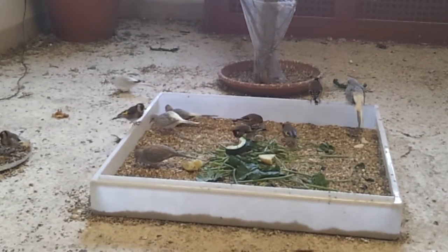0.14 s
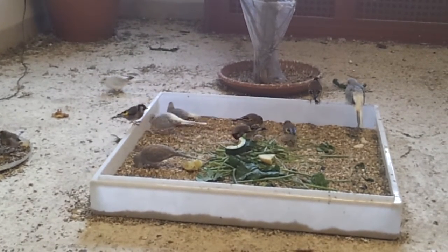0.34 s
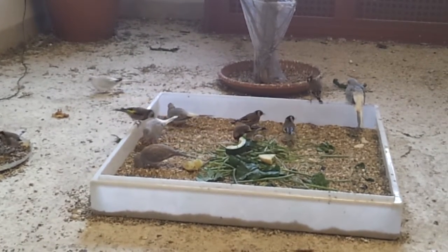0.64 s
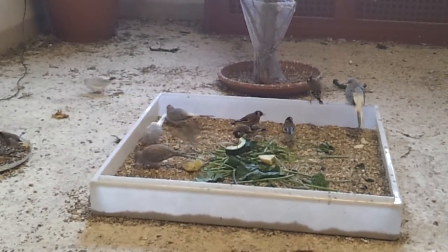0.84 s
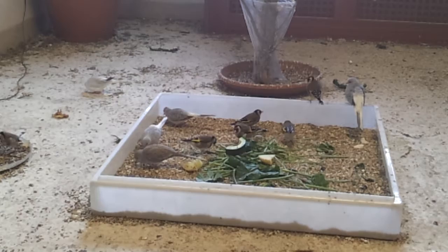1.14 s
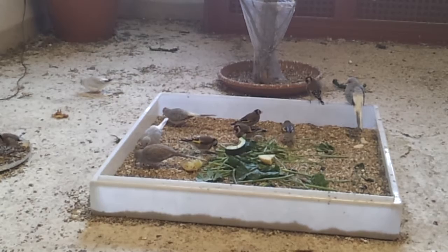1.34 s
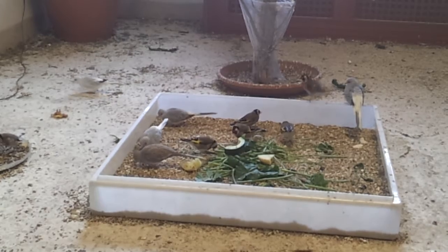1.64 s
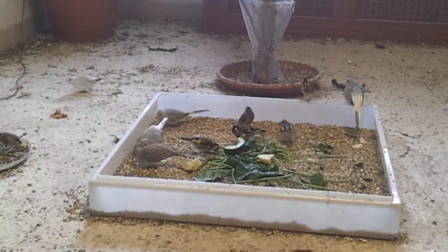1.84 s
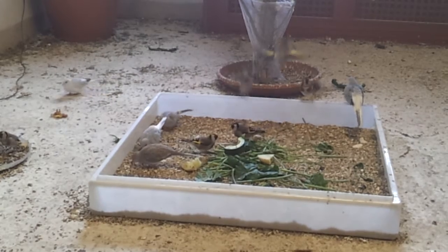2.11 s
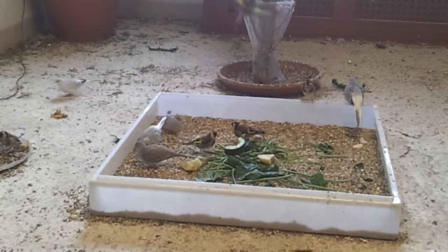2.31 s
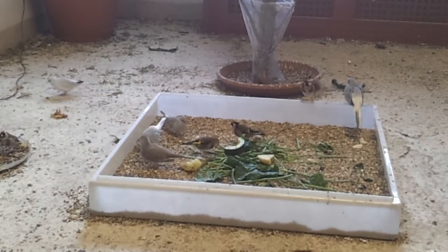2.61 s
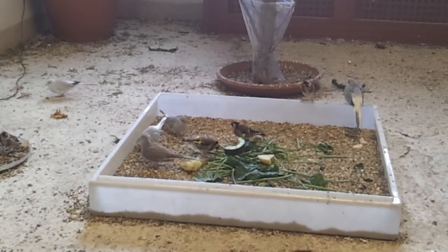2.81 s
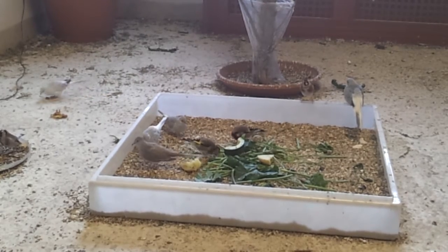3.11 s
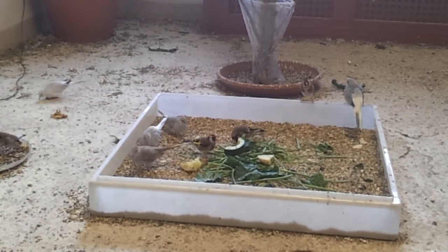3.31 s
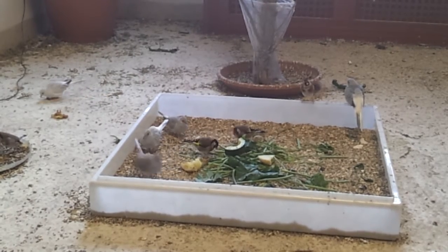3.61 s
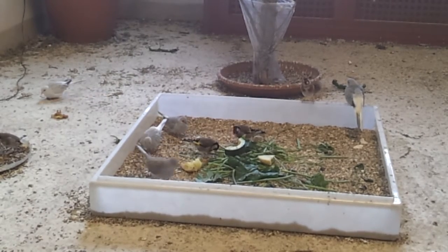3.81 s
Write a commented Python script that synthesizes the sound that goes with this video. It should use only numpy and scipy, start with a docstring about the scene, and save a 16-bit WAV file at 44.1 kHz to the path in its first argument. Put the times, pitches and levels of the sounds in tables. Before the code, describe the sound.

Finches twitter in a reverberant aviary. For the first 1.8 seconds there is only faint seed rustling and pecking over a low rumble. Wings clatter briefly at about 1.9 seconds, followed by soft puffs of fluttering. From 2.1 seconds loud, high whistles and nasal calls sound slightly to the right, with four buzzy chirps around 3 seconds. A faint low drone swells, and a two-pitched trill runs from 3.5 to 3.9.

```python
"""Seed husks rustle over a low rumble: finches are feeding at a tray in a hard-walled aviary.
One takes off with a clatter of wing claps, and others flutter up in soft puffs of air.
Loud twittering follows: whistles and buzzy chirps (modulated tones) and nasal calls (filtered pulses),
ending in a two-pitched trill over a brief low drone. Dense wall reflections smear the song."""
import sys
import numpy as np
from scipy import signal
from scipy.fft import rfft, irfft
from scipy.io import wavfile

SR = 44100
rng = np.random.default_rng(int(sys.argv[2]) if len(sys.argv) > 2 else 0)


def file_out(sig):
    """Save sig as 16-bit WAV at sys.argv[1]."""
    # one column per channel
    cols = np.atleast_2d(sig).T
    # limit, then scale
    lim = np.clip(cols, -1, 1)
    pcm = np.round(lim * 32767).astype(np.int16)
    wavfile.write(sys.argv[1], SR, pcm)


N = 174195
TIME = np.arange(N) / SR

# Whistled notes. Each row: start and length in seconds, first and last pitch in Hz,
# relative level in dB, pitch flutter in Hz.
WHISTLES = [(2.096, 0.039, 2950, 2925, -38, 111), (2.101, 0.034, 3284, 3277, -33, 90),
            (2.18, 0.023, 4850, 4540, -35, 425), (2.183, 0.016, 4195, 4175, -33, 60),
            (2.212, 0.03, 2910, 2862, -32.5, 132), (2.257, 0.021, 4125, 4260, -24, 98),
            (2.265, 0.039, 4450, 4644, -29.5, 468), (2.367, 0.026, 6730, 6620, -33, 158),
            (2.357, 0.03, 13300, 13400, -44.5, 177), (2.387, 0.023, 2923, 2903, -30.5, 82),
            (2.396, 0.031, 4400, 4390, -27.5, 348), (2.405, 0.114, 5400, 5290, -39.5, 166),
            (2.427, 0.048, 3370, 3260, -29.5, 224), (2.5, 0.023, 3644, 4340, -25, 190),
            (2.523, .048, 4660, 5350, -27.5, 232), (2.612, 0.02, 2604, 4540, -33, 300),
            (2.627, 0.014, 4137, 4310, -18.5, 234), (2.667, 0.025, 4290, 4327, -32, 97),
            (2.734, 0.075, 3445, 3263, -33, 203), (2.827, 0.05, 3678, 3890, -29, 243),
            (2.902, 0.051, 2682, 2720, -37, 133.5), (3.022, 0.036, 2765, 2526, -34, 227),
            (3.144, 0.054, 3083, 3206, -32.5, 132.5), (3.258, 0.043, 2756, 2934, -33.5, 190),
            (3.369, 0.039, 7580, 7620, -46.5, 220), (3.398, 0.05, 5715, 5670, -24.5, 56),
            (3.466, 0.036, 4200, 4440, -26.5, 116), (3.922, 0.05, 5950, 6130, -22, 104)]
# Repeats of one chirp. Each row: start and length in seconds, relative level in dB.
BUZZY_CHIRPS = [(2.95, 0.033, -21.5), (3.066, 0.024, -19), (3.183, .026, -20), (3.301, 0.033, -21.5)]
# Pips of the trill. Each row: start in seconds, pitch in Hz, relative level in dB.
TRILL_PIPS = [(3.493, 5144, -22.5), (3.543, 4300, -20), (3.586, 5150, -22), (3.618, 4298, -23.5),
              (3.657, 5170, -23.5), (3.689, 4270, -22.5), (3.703, 5160, -24), (3.748, 4290, -23),
              (3.756, 5185, -25), (3.79, 5336, -24), (3.813, 4290, -20.5), (3.85, 5190, -21.5),
              (3.865, 4306, -31.5)]
# Side tones of a pip. Each row: pitch in Hz, flutter in Hz, level in dB relative to the pip.
PIP_SIDE_TONES = [(3360, 94, -18), (6490, 260, -17.5)]
# Nasal calls. Each row: start and length in seconds, pitch in Hz, relative level in dB.
NASAL_CALLS = [(2.253, 0.049, 730.5, -35.5), (2.39, 0.056, 709.6, -34), (2.492, 0.054, 669, -34.5),
               (2.614, 0.068, 608.4, -34), (2.885, 0.048, 669, -40), (3.028, .07, 608, -38.5),
               (3.239, 0.051, 664, -39), (3.376, 0.026, 976, -42.5)]
# Wing claps. Each row: start in seconds, relative level in dB.
WING_CLAPS = [(1.8433, -19.5), (1.853, -24.5), (1.872, -19), (1.887, -25), (1.901, -20), (1.914, -35),
              (1.925, -26), (1.93, -25.5), (1.961, -20.5)]
# Pecks in the seed. Each row: start in seconds, relative level in dB.
SEED_PECKS = [(0.513, -48.5), (0.653, -53), (0.82, -45), (.845, -52), (1.331, -46)]

# Spectra of throat and beak, feathers, wing draught, husks and rumble.
# Each row: frequency in Hz, relative level in dB.
BEAK_SPECTRUM = [(1200, -25), (2000, -3), (2800, -9.5), (5200, 3.5), (6200, -5.5), (8000, -4.5),
                 (10000, -16), (14000, -40)]
FEATHER_SPECTRUM = [(280, -32), (430, -10), (580, -1), (820, -11), (1100, -4), (1450, -13), (2100, -4),
                    (2700, -8.5), (4700, -7.5), (8000, -9), (14000, -38)]
DRAUGHT_SPECTRUM = [(25, -21), (42, 3.5), (62, 3.5), (88, -9), (115, -2), (160, -8.5), (250, -4),
                    (520, -9.5), (800, -16), (1700, -12.5), (4000, -34.5)]
HUSK_SPECTRUM = [(500, -0.5), (1800, -9), (3000, -4.5), (5500, -4.5), (7100, 1), (9000, -4.5),
                 (12000, -5.5), (15000, -6)]
RUMBLE_SPECTRUM = [(25, -23.5), (62, 4), (90, -17), (200, -9), (420, -12.5), (700, -15.5), (1100, -14),
                   (2500, -26.5), (7000, -26.5), (14000, -68)]

# Envelopes of wing draught, seed rustle, rumble and drone. Each row: time in seconds, level in dB.
DRAUGHT_ENVELOPE = [(0, -48.5), (.25, -55.5), (.45, -46), (.8, -49), (1.1, -59), (1.45, -46), (2.03, -55),
                    (2.13, -38.5), (2.28, -38.5), (2.45, -38.5), (2.65, -36.5), (2.85, -42), (3.25, -39.5),
                    (3.5, -45.5), (3.9, -54)]
RUSTLE_ENVELOPE = [(0, -49.5), (.13, -55), (.42, -48.5), (.62, -56.5), (.82, -49.5), (1.15, -58.5),
                   (1.38, -47.5), (1.65, -60), (1.76, -50.5), (3.2, -65)]
RUMBLE_ENVELOPE = [(0, -47.5), (.8, -48.5), (1.15, -49.5), (1.45, -53), (1.8, -48), (3.95, -51)]
DRONE_ENVELOPE = [(3.05, -60.5), (3.25, -43), (3.6, -54.5)]

# Coherence of diffuse noise. Each row: frequency in Hz, left-right correlation.
DIFFUSE_COHERENCE = [(250, 0.81), (550, 0.71), (1100, -0.23), (3000, -0.27)]
# Balance of diffuse noise. Each row: frequency in Hz, left minus right level in dB.
DIFFUSE_BALANCE = [(50, 6), (250, 0.5), (2000, 0)]
# Reverberation of the aviary. Each row: frequency in Hz, time in seconds to fall by 60 dB.
REVERB_TIMES = [(3000, 1), (5000, 0.71), (8000, 0.9), (14000, 0.23)]


def twitter(gain_db=7, rasp_db=-14, reference_flutter_hz=200):
    """Modulation roughens a gliding tone: the more its pitch flutters, the raspier the note."""
    out = np.zeros(N)
    for start, length, first_hz, last_hz, db, flutter_hz in WHISTLES:
        envelope = syllable(length)
        roughness = rasp(len(envelope), rasp_db + 20 * np.log10(flutter_hz / reference_flutter_hz))
        tone = np.sin(glide_phase(len(envelope), first_hz, last_hz, flutter_hz))
        add(out, start, from_db(db + gain_db) * envelope * roughness * tone)
    return out


def chirps(gain_db=7, fifth_db=-20, octave_db=-33):
    """Modulation makes a slightly rising chirp buzz, with faint tones a fifth and an octave above."""
    out = np.zeros(N)
    for start, length, db in BUZZY_CHIRPS:
        envelope = syllable(length)
        phase = glide_phase(len(envelope), first_hz=4030, last_hz=4104, flutter_hz=267.6)
        overtones = from_db(fifth_db) * np.sin(1.5 * phase) + from_db(octave_db) * np.sin(2 * phase)
        tone = rasp(len(envelope), depth_db=-14) * (np.sin(phase) + overtones)
        add(out, start, from_db(db + gain_db) * envelope * tone)
    return out


def trill(gain_db=3):
    """Superposition of a raspy tone and faint side tones makes pips that hop between two pitches."""
    out, envelope = np.zeros(N), syllable(length_s=0.0595)
    n = len(envelope)
    for start, hz, db in TRILL_PIPS:
        tone = rasp(n, depth_db=-16) * np.sin(glide_phase(n, hz, hz, flutter_hz=135))
        for side_hz, flutter_hz, side_db in PIP_SIDE_TONES:
            tone += from_db(side_db) * np.sin(glide_phase(n, side_hz, side_hz, flutter_hz))
        add(out, start, from_db(db + gain_db) * envelope * tone)
    return out


def nasal_calls(gain_db=3, arch_depth=0.14, jitter=0.0514, top_hz=14600):
    """Source and filter: throat and beak resonances shape jittery pulses on an arching pitch."""
    out = np.zeros(N)
    for start, length, hz, db in NASAL_CALLS:
        envelope = syllable(length)
        arch = np.sin(np.linspace(0, np.pi, len(envelope))) - 0.5
        pitch = hz * (1 + arch_depth * arch + jitter * wobble(len(envelope), 361))
        phase = 2 * np.pi * np.cumsum(pitch) / SR
        pulses = sum(np.cos(k * phase) for k in range(1, int(top_hz / hz)))
        add(out, start, from_db(db + gain_db) * envelope * unit_rms(pulses))
    return colour(out, BEAK_SPECTRUM)


def take_off(gain_db=2, clap_decay_s=0.0021, swish_decay_s=0.017, swish_db=-13, rattles_per_s=3000):
    """Impulsive excitation: each wing stroke is a sharp clap and a short swish of rattling feathers."""
    force, t = np.zeros(N), TIME[:SR // 5]
    stroke = np.exp(-t / clap_decay_s) + from_db(swish_db) * np.exp(-t / swish_decay_s)
    for start, db in WING_CLAPS:
        add(force, start, from_db(db + gain_db) * stroke)
    rattle = from_db(-2) * unit_rms(random_clicks(rattles_per_s))
    return colour(force * unit_rms(rng.standard_normal(N) + rattle), FEATHER_SPECTRUM)


def wing_cracks(peak_db=-26, decay_s=0.003, exponent=2.5):
    """Wing tips meet in a dry, bright crack; a power law favours the hardest strokes."""
    force, decay = np.zeros(N), np.exp(-TIME[:SR // 20] / decay_s)
    hardest_db = max(db for _, db in WING_CLAPS)
    for start, db in WING_CLAPS:
        add(force, start, from_db(peak_db + exponent * (db - hardest_db)) * decay)
    return force * rng.standard_normal((2, N))


def wing_draught():
    """Air displaced by birds on the wing is heard as soft puffs of low noise."""
    return level(DRAUGHT_ENVELOPE) * diffuse_noise(DRAUGHT_SPECTRUM)


def seeds(peck_gain_db=3.5, peck_decay_s=0.01, husks_per_s=1200):
    """Shot noise: tiny husk clicks merge into a rustle that swells as the birds shuffle and peck."""
    force = level(RUSTLE_ENVELOPE)
    for start, db in SEED_PECKS:
        add(force, start, from_db(db + peck_gain_db) * np.exp(-TIME[:SR // 10] / peck_decay_s))
    clicks = random_clicks(husks_per_s) * from_db(-0.5 * np.minimum(rng.exponential(1, N), 4))
    rustle = unit_rms(unit_rms(clicks) + 0.57 * rng.standard_normal(N))
    return colour(force * rustle, HUSK_SPECTRUM)


def background(drone_hz=111):
    """A diffuse field of distant rumble and faint hiss; a low, wavering drone swells near the end."""
    pitch = drone_hz + 4 * wobble(N, 17)
    drone = np.sqrt(2) * np.sin(2 * np.pi * np.cumsum(pitch) / SR)
    return level(RUMBLE_ENVELOPE) * diffuse_noise(RUMBLE_SPECTRUM) + level(DRONE_ENVELOPE) * drone


def aviary(x, direct_db, left_lag_s, build_up_s=0.0016):
    """Reverberation: dense reflections follow the direct sound and die sooner in the treble."""
    t, tail = TIME[:SR], 0
    edges_hz = np.geomspace(120, 18000, 11)
    for low, high in zip(edges_hz, edges_hz[1:]):
        bandpass = signal.butter(2, [low, high], "band", fs=SR, output="sos")
        band = signal.sosfilt(bandpass, rng.standard_normal((2, SR)))
        tail += band * np.exp(-np.log(1000) * t / at_hz(REVERB_TIMES, np.sqrt(low * high)))
    tail *= 1 - np.exp(-t / build_up_s)
    tail /= np.sqrt(np.sum(tail ** 2, axis=1, keepdims=True))
    reflections = signal.fftconvolve(x[None], tail, axes=1)[:, :N]
    ears = np.array([np.interp(TIME - left_lag_s, TIME, x), x])
    direct = from_db(direct_db)
    return (direct * ears + reflections) / np.hypot(1, direct)


def diffuse_noise(spectrum):
    """Partial coherence: the two channels are alike in the bass and nearly unrelated in the treble."""
    hz, sides = np.fft.rfftfreq(N, 1 / SR), np.array([[1], [-1]])
    mid, side = rfft(rng.standard_normal((2, N)))
    correlation = at_hz(DIFFUSE_COHERENCE, hz)
    ears = np.sqrt(1 + correlation) * mid + np.sqrt(1 - correlation) * side * sides
    gain = from_db(at_hz(spectrum, hz) + sides * at_hz(DIFFUSE_BALANCE, hz) / 2) * (hz > 20)
    return unit_rms(irfft(gain * ears, N))


def syllable(length_s, attack_s=0.0016, release_s=0.01):
    """Amplitude envelope of one note: rounded attack, hold and release."""
    t = TIME[:int((length_s + release_s / 2) * SR)]
    ramps = np.clip(t / attack_s, 0, 1) * np.clip((t[-1] - t) / release_s, 0, 1)
    return np.sin(np.pi / 2 * ramps) ** 2


def glide_phase(n, first_hz, last_hz, flutter_hz):
    """Phase is the integral of frequency, here a glide with random flutter."""
    flutter = flutter_hz * np.sqrt(2) * np.tanh(wobble(n, bandwidth_hz=311))
    return 2 * np.pi * np.cumsum(np.linspace(first_hz, last_hz, n) + flutter) / SR


def rasp(n, depth_db):
    """Fast random amplitude modulation is heard as roughness."""
    return 1 + from_db(depth_db) * wobble(n, bandwidth_hz=700)


def wobble(n, bandwidth_hz):
    """Low-passed noise gives smooth random motion of unit power."""
    lowpass = signal.butter(4, bandwidth_hz, fs=SR, output="sos")
    return unit_rms(signal.sosfilt(lowpass, rng.standard_normal(n + SR // 10))[-n:])


def random_clicks(per_s):
    """A Poisson process of impulses with random sign."""
    return (rng.random(N) < per_s / SR) * rng.choice([-1, 1], N)


def colour(x, spectrum, size=2048):
    """A minimum-phase filter imposes the spectrum; white noise keeps its power."""
    magnitude = unit_rms(from_db(at_hz(spectrum, np.fft.rfftfreq(size, 1 / SR))))
    cepstrum = irfft(np.log(magnitude))
    cepstrum[1:size // 2] *= 2  # folding the cepstrum makes the filter causal
    cepstrum[size // 2 + 1:] = 0
    return signal.fftconvolve(x, irfft(np.exp(rfft(cepstrum))))[:N]


def pan(left_minus_right_db):
    """A level difference between the ears sets the direction."""
    return unit_rms(from_db(np.array([[1], [-1]]) * left_minus_right_db / 2))


def level(envelope):
    """Gain over time, interpolated in decibels."""
    return from_db(np.interp(TIME, *np.transpose(envelope)))


def at_hz(table, hz):
    """Interpolation on a log-frequency axis."""
    frequencies, values = np.transpose(table)
    return np.interp(np.log(hz + 1e-3), np.log(frequencies), values)


def from_db(db):
    """Decibels to amplitude ratio."""
    return 10 ** (np.asarray(db) / 20)


def unit_rms(x):
    """Normalisation to unit power."""
    return x / np.sqrt(np.mean(x ** 2) + 1e-20)


def add(out, start_s, x):
    """Superposition of a sound at a given time."""
    i = int(start_s * SR)
    out[i:i + len(x)] += x[:N - i]


def scene(left_lag_s=0.0004094):
    """Time and level differences place the birds to the right, within the diffuse background."""
    calls = twitter() + chirps() + nasal_calls()
    song = aviary(calls, direct_db=-2, left_lag_s=left_lag_s) * pan(-4)
    song += aviary(trill(), direct_db=-2, left_lag_s=left_lag_s) * pan(-2)
    claps = aviary(take_off(), direct_db=-3, left_lag_s=left_lag_s / 2)
    wings = (claps + wing_cracks()) * pan(-3) + wing_draught()
    feeding = aviary(seeds(), direct_db=-1, left_lag_s=0) * pan(-2.5)
    return song + wings + feeding + background()


def record(dry, cutoff_hz=14600):
    """An elliptic low-pass filter cuts the highest treble steeply."""
    return signal.sosfilt(signal.ellip(10, 0.2, 80, cutoff_hz, fs=SR, output="sos"), dry)


dry = scene()
out = record(dry)
file_out(out)
```